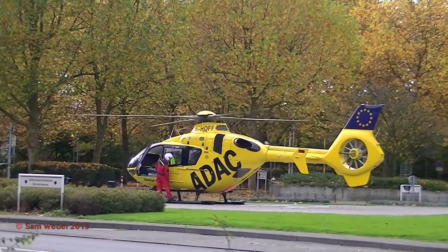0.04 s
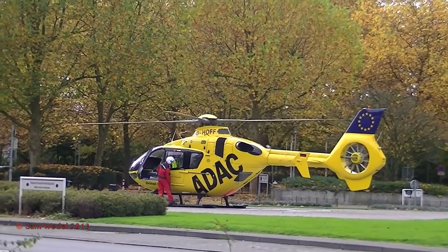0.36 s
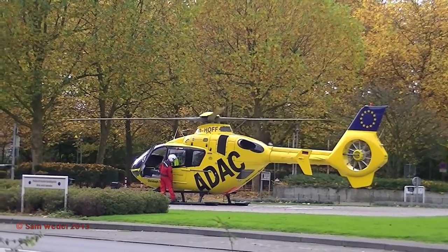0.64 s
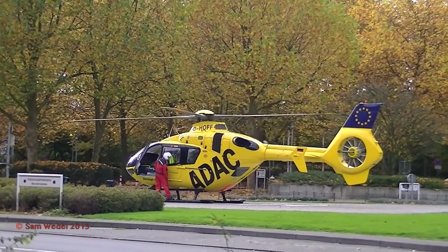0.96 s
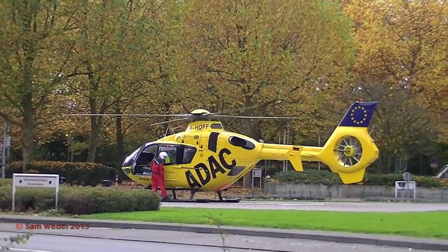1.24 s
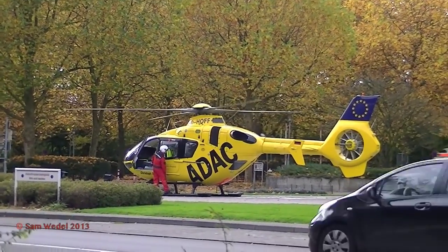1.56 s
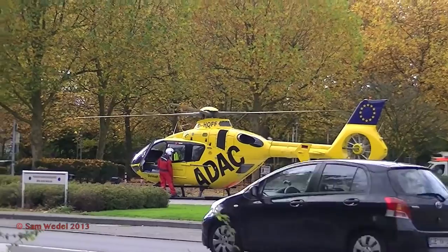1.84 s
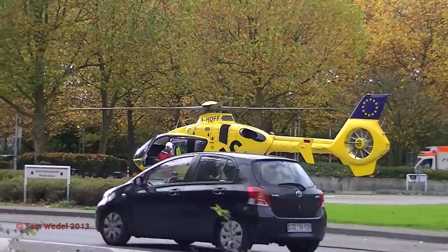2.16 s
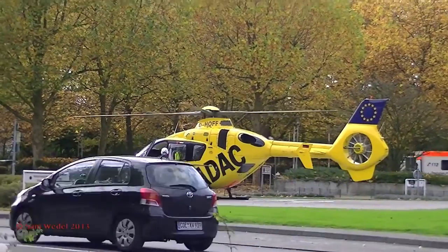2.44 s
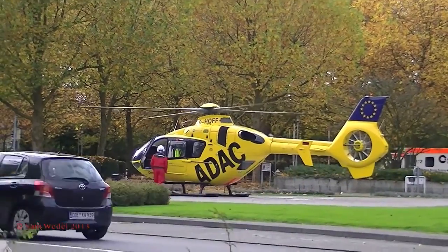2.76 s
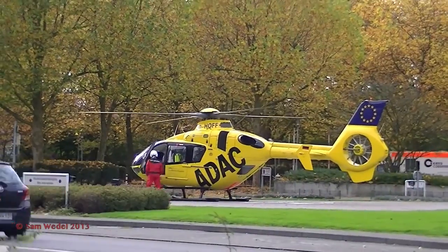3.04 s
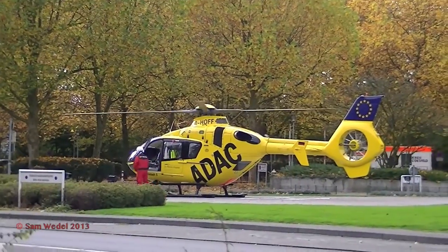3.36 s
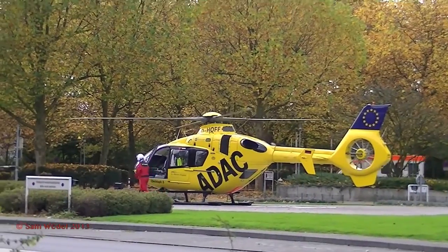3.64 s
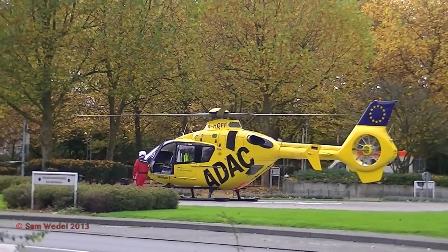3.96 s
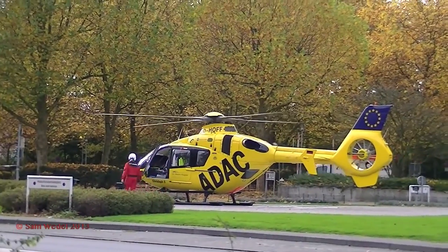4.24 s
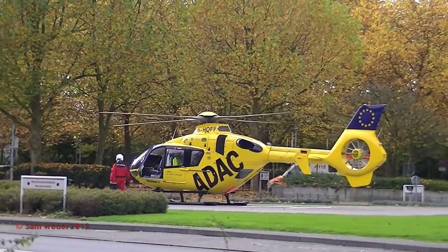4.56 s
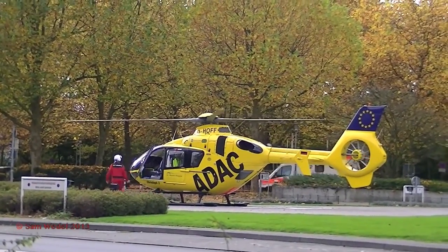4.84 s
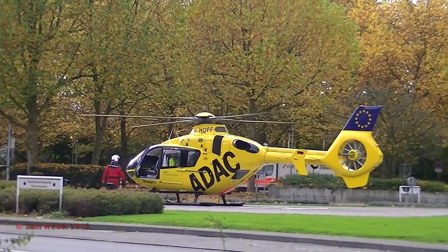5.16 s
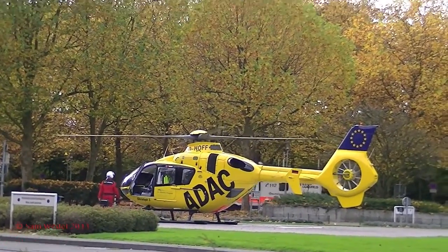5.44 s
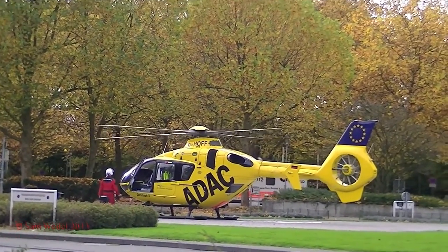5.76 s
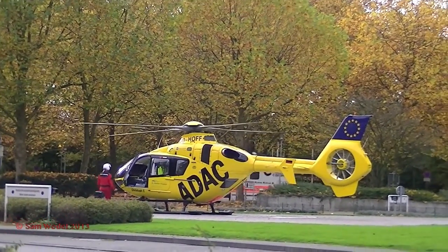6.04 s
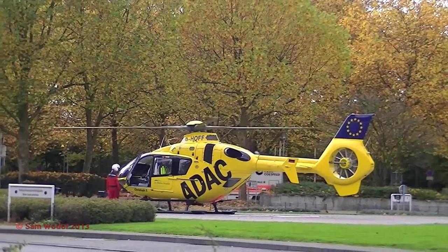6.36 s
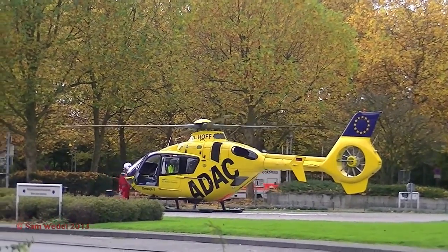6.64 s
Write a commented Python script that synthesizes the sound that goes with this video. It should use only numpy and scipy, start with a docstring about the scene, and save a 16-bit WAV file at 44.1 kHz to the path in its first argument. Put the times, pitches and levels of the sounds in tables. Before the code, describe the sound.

A twin-turbine helicopter idles on its pad, heard from across a street. A bright, rushing hiss dominates, over a rough exhaust roar and a low, wavering gear hum. A thin, very high whine swells and fades repeatedly as its pitch creeps upward. About two seconds in, a car's tyres pass, barely audible, and a faint wash of traffic stays under the engines.

```python
"""Helicopter idling across a street

A twin-turbine helicopter idles on its pad, its engines slowly gathering speed. The exhausts roar,
the intakes hiss, and the compressor sings a thin high whine that swells and fades as its pitch climbs.
A car rolls by in front, its tyres barely heard under the engines."""
import sys
import numpy as np
from scipy import signal
from scipy.fft import rfft, irfft
from scipy.io import wavfile
from scipy.ndimage import uniform_filter1d

SR = 44100
rng = np.random.default_rng(int(sys.argv[2]) if len(sys.argv) > 2 else 0)


def output_pcm(signal):
    """Save a mono or channel-first signal as 16-bit PCM at the path in sys.argv[1].

    Samples are clipped to [-1, 1] before scaling.
    """
    pcm = np.clip(np.atleast_2d(signal).T, -1, 1) * 32767
    wavfile.write(sys.argv[1], SR, np.round(pcm).astype(np.int16))


N = 300321
T = np.arange(N) / SR
FRAME, HOP = 1024, 256  # samples
FRAME_T = np.arange(N // HOP + 5)[:, None] * HOP / SR
BIN_HZ = np.fft.rfftfreq(FRAME, 1 / SR)[None]


def amp(db):
    """Decibels to gain."""
    return 10 ** (np.asarray(db) / 20)


def unit(x):
    """Scales to rms 1."""
    return x / np.sqrt(np.mean(abs(x) ** 2) + 1e-20)


def follow(table, t=T):
    """The columns of an automation curve at times t."""
    times, *columns = np.transpose(table)
    return [np.interp(t, times, column) for column in columns]


def colour(points):
    """Gain of an EQ curve at every bin."""
    hz, db = np.transpose(points)
    return amp(np.interp(np.log(BIN_HZ + 1), np.log(hz), db))


def bell(x, centre, width):
    """A smooth bump of height 1."""
    return np.exp(-np.log(16) * ((x - centre) / width) ** 2)


def resonances(modes):
    """Gain of a set of steep-sided resonances at every bin."""
    power = 0
    for hz, width, db in modes:
        detuning = (BIN_HZ ** 2 - hz ** 2) / (BIN_HZ + 1) / (1.29 * width)
        power = power + amp(db) ** 2 / (1 + detuning ** 2) ** 2
    return np.sqrt(power)


def drift(rate_hz):
    """A slow random wander of rms 1, rolled off above the rate."""
    hz = np.fft.rfftfreq(N, 1 / SR)
    return unit(irfft(rfft(rng.standard_normal(N)) * np.exp(-(hz / rate_hz) ** 2), N))


def noise(gain, patchy_db):
    """Noise of rms 1 and the given colour; eddies in the air brighten and dull it in patches."""
    real, imag, eddies = rng.standard_normal((3, FRAME_T.size, BIN_HZ.size))
    for _ in range(2):
        eddies = uniform_filter1d(uniform_filter1d(eddies, size=12, axis=0), size=6, axis=1)
    spectra = (real + 1j * imag) * gain * amp(patchy_db * unit(eddies))
    return unit(signal.istft(spectra.T, nperseg=FRAME, noverlap=FRAME - HOP)[1][:N])


def tone(hz, scatter, scatter_hz):
    """A tone of rms 1: the direct sound plus a share scattered by turbulence."""
    flutter = 1 + scatter * (drift(scatter_hz) + 1j * drift(scatter_hz))
    return unit((flutter * np.exp(2j * np.pi * np.cumsum(hz) / SR)).real)


# Fader ride of the traffic bed: time_s, level_db
TRAFFIC_LEVEL = [(0, -49), (1.3, -48), (2.2, -40), (5.3, -40.5), (6.81, -37)]
# Its dull colour: freq_hz, gain_db
TRAFFIC_EQ = [(20, -42), (45, -27), (80, -24), (105, -13.5), (160, 0.5), (500, -1.5), (1200, 6.5),
              (3000, -10), (8000, -23)]


def street():
    """A wash of traffic, and the tyres of one car swelling and fading as it rolls past."""
    wash = amp(follow(TRAFFIC_LEVEL)[0]) * noise(colour(TRAFFIC_EQ), patchy_db=1.0)
    pass_by = amp(-34.5) * bell(T, centre=2.22, width=.4)
    tyres = pass_by * noise(resonances([(1210, 260, 0)]), patchy_db=.5)
    return wash + tyres


# Steady notes of the drive train: pitch_hz, level_db
GEAR_TONES = [(235, -46), (297, -38.5), (584, -46), (640, -52), (729, -44.5), (800, -43), (928, -46),
              (1008, -45)]


def gearbox():
    """Gearbox and rotor drive hum in low, wavering tones, half buried in the exhaust."""
    return sum(amp(db) * tone(hz, scatter=.35, scatter_hz=4) for hz, db in GEAR_TONES)


# Run-up of the second spool: time_s, pitch_hz, tone_db, rush_db
SPOOL_RUN_UP = [(0, 778, -41, -45), (.3, 803, -39, -43), (.6, 830, -42, -40), (1.1, 870, -48, -42),
                (1.5, 903, -48, -52), (2.1, 950, -45, -70), (2.8, 990, -70, -80)]


def second_spool():
    """A spool runs up: a low note and a narrow, high rush of blade noise both climb and fade."""
    pitch_hz, tone_db, rush_db = follow(SPOOL_RUN_UP)
    rush_hz = 16.4 * follow(SPOOL_RUN_UP, FRAME_T)[0]
    rush = noise(bell(BIN_HZ, rush_hz, width=900), patchy_db=.6)
    return amp(tone_db) * tone(pitch_hz, scatter=.38, scatter_hz=12) + amp(rush_db) * rush


# Rising speed of the gas generator shaft, eased back once by the governor: time_s, rotation_hz
SHAFT_SPEED = [(0, 683.3), (1, 693.2), (2.5, 709.9), (4, 726.2), (5, 738.2), (5.15, 738.5), (5.32, 725.8),
               (5.45, 725), (5.9, 730.3), (6.81, 743.6)]


def overspeed(t=T):
    """Shaft speed in percent above its mean."""
    shaft_hz, = follow(SHAFT_SPEED, t)
    return 100 * (shaft_hz / shaft_hz.mean() - 1)


# Swells and fades of the compressor whine: time_s, level_db
WHINE_LEVEL = [(0, -35), (.65, -49), (1.05, -32), (1.42, -45), (1.74, -33.5), (2.1, -48), (2.3, -34),
               (2.6, -31), (2.75, -41), (3.27, -38), (3.56, -30), (3.72, -42), (4.02, -31), (4.22, -41),
               (4.52, -37), (5.42, -31.5), (5.62, -41), (6.8, -39)]
# Harmonics of the shaft: multiple, level_db
SHAFT_HARMONICS = [(2, -47.5), (3, -46.5), (4, -47), (5, -45), (10, -49)]
# Pitches at which a shaft harmonic swells as it climbs through: centre_hz, width_hz, lift_db
HARMONIC_SWELLS = [(1386, 40, 6), (1426, 46, 9.5), (2065, 50, 6), (2895, 90, 9), (3550, 50, 7)]


def gas_generator(blades=15):
    """The compressor's blade tone and the shaft harmonics, locked to one slightly unsteady speed."""
    shaft_hz = follow(SHAFT_SPEED)[0] - .25 + .3 * drift(rate_hz=12)
    whine_db = follow(WHINE_LEVEL)[0] + 1.6 * drift(rate_hz=10)  # a quick twinkle on top
    whine = amp(whine_db) * tone(blades * shaft_hz, scatter=.33, scatter_hz=40)
    harmonics = 0
    for multiple, level_db in SHAFT_HARMONICS:
        pitch_hz = multiple * shaft_hz
        lift_db = sum(lift * bell(pitch_hz, hz, width) for hz, width, lift in HARMONIC_SWELLS)
        harmonics += amp(level_db + lift_db) * tone(pitch_hz, scatter=.22, scatter_hz=26)
    return whine + harmonics


# Fader ride of the hiss: time_s, level_db
HISS_LEVEL_DB = [(0, -17.5), (.7, -18.5), (3.6, -18), (4.3, -18.5), (5.3, -18), (6, -19.5), (6.81, -19.5)]
# Its base colour: freq_hz, gain_db
HISS_EQ = [(1500, -19), (2600, -7.5), (3400, -2.5), (4300, 0.5), (5400, 0.5), (6300, -1.5), (7100, 2),
           (8100, -1), (9000, -6.5), (10500, -15), (13000, -35)]
# Humps and hollows on that colour, at mean shaft speed: centre_hz, width_hz, start_db, end_db
HISS_HUMPS = [(3880, 200, -1.5, -2.5), (4300, 400, 1.8, -1), (4680, 220, 4, 0), (5380, 380, 3.8, 1.8),
              (5320, 110, 2.2, 1.8), (5980, 170, 1.2, 2), (7230, 180, 2, 2), (7850, 300, 2, 2.8)]


def intake_hiss():
    """Air tears through the compressors in a hiss whose humps climb with the shaft speed."""
    shaft_hz, = follow(SHAFT_SPEED, FRAME_T)
    speed_ratio, progress = shaft_hz / shaft_hz.mean(), FRAME_T / T[-1]
    humps_db = sum((start + (end - start) * progress) * bell(BIN_HZ, hz * speed_ratio, width)
                   for hz, width, start, end in HISS_HUMPS)
    tilt_db_per_octave = -.07 + .01 * overspeed(FRAME_T)
    octaves = np.maximum(np.log2((BIN_HZ + 1) / 6000), -1)
    eq = colour(HISS_EQ) * amp(humps_db + tilt_db_per_octave * octaves) * (BIN_HZ > 600)
    return amp(follow(HISS_LEVEL_DB)[0]) * noise(eq, patchy_db=1.12)


# Fader ride of the fizz: time_s, level_db
FIZZ_LEVEL_DB = [(0, -25.7), (1.1, -27), (1.6, -26), (2.12, -28.5), (2.45, -26), (2.9, -26.5),
                 (3.68, -25.8), (3.71, -27.5), (4.5, -27.5), (5.3, -24.5), (5.55, -27.5), (6.1, -27.5),
                 (6.7, -25.5)]
# Its base colour: freq_hz, gain_db
FIZZ_EQ = [(6500, -11.5), (8300, -6.5), (9300, 0), (10200, -2), (11300, -4.5), (12300, -7), (13300, -13.5),
           (14400, -15), (15700, -24)]


def intake_fizz():
    """The top end of the rushing air, dulling as the shaft gains speed."""
    tilt_db_per_octave = -.5 * overspeed(FRAME_T)
    octaves = np.log2(np.maximum(BIN_HZ / 9500, 1))
    eq = colour(FIZZ_EQ) * amp(tilt_db_per_octave * octaves) * (BIN_HZ > 4000)
    return amp(follow(FIZZ_LEVEL_DB)[0]) * noise(eq, patchy_db=1.0)


def intake(dip_s=3.69, recover_s=.063):
    """Hiss and fizz shimmer together; once, both drop suddenly and recover."""
    shimmer_db = .58 * drift(rate_hz=9)
    dip_db = -3 * (T > dip_s) * np.exp(-abs(T - dip_s) / recover_s)
    return amp(dip_db) * (amp(.81 * shimmer_db) * intake_hiss() + amp(shimmer_db) * intake_fizz())


# Low, middle and high resonances of the exhaust: centre_hz, width_hz, gain_db
RUMBLE_MODES = [(236.3, 41, -2), (286.7, 55, 3), (332, 140, -6), (412, 73, -5)]
ROAR_MODES = [(731, 68, -1.5), (805, 150, -1), (996, 186, -1), (1400, 224, -5), (596, 64, -7.5)]
RASP_MODES = [(1604, 150, -3.5), (1860, 230, -4.5), (2050, 370, 0.5), (2260, 90, -4), (2635, 220, 0),
              (2860, 310, -1.5), (3340, 640, -8.5)]
# The exhaust swelling and sagging, most of all in the bass: time_s, swell_db
EXHAUST_SWELL = [(0, -.5), (.6, 0.2), (1.3, 2.5), (1.9, -1), (2.45, -2.5), (3.1, 1.5), (3.7, -1.2),
                 (4, 1.3), (4.3, -0.8), (4.95, 1), (5.17, -3.3), (5.65, 3), (6.25, 0), (6.81, 2.5)]


def exhaust():
    """Combustion noise in three groups of resonances, growing with the shaft speed."""
    speed_percent = overspeed()
    swell_db, = follow(EXHAUST_SWELL)
    rumble_db = -35.5 + .17 * speed_percent + swell_db
    roar_db = -29.5 + .5 * speed_percent + .74 * swell_db
    rasp_db = -27 + .5 * speed_percent + .54 * swell_db
    rumble = amp(rumble_db) * noise(resonances(RUMBLE_MODES), patchy_db=-.15)
    roar = amp(roar_db) * noise(resonances(ROAR_MODES), patchy_db=1.0)
    rasp = amp(rasp_db) * noise(resonances(RASP_MODES), patchy_db=1.0)
    return rumble + roar + rasp


def scene():
    """Everything is far enough away to arrive as one point of sound."""
    buffet = amp(.64 * drift(rate_hz=44))  # the downwash shakes exhaust and intake at once
    mix = buffet * (exhaust() + intake()) + gas_generator() + gearbox() + second_spool() + street()
    return np.array([mix, mix])


def record(dry, low_cut_hz=80, high_cut_hz=15720):
    """A gentle low cut and a steep high cut on the whole mix."""
    thinned = signal.sosfilt(signal.butter(2, low_cut_hz, "highpass", fs=SR, output="sos"), dry)
    high_cut = signal.firwin(1023, high_cut_hz, window=("kaiser", 9), fs=SR)
    return signal.oaconvolve(thinned, high_cut[None], "same")


dry = scene()
out = record(dry)
output_pcm(out)
```